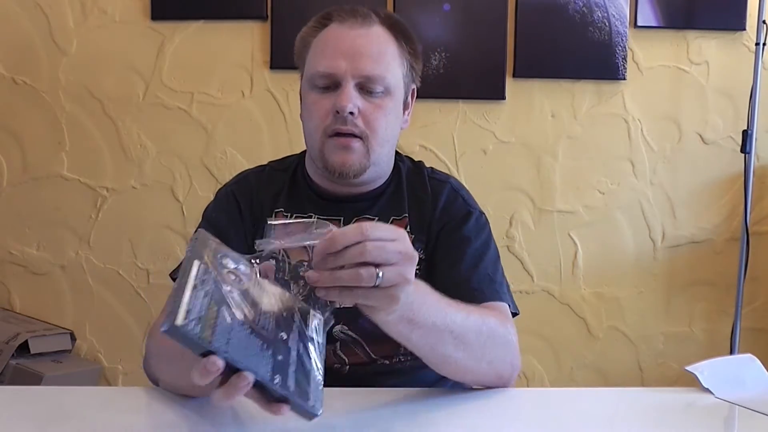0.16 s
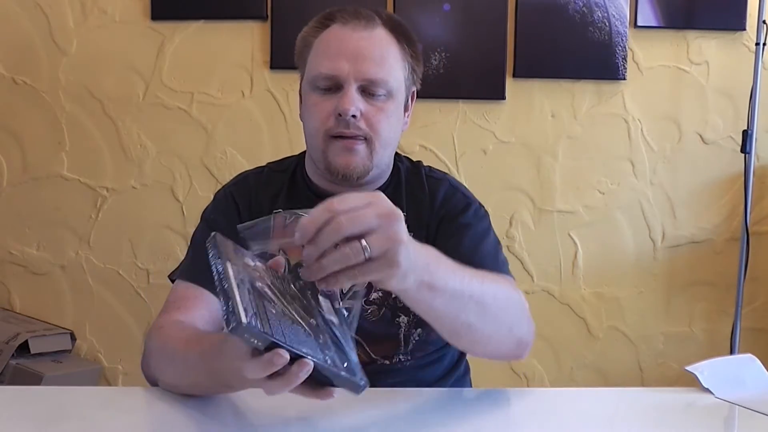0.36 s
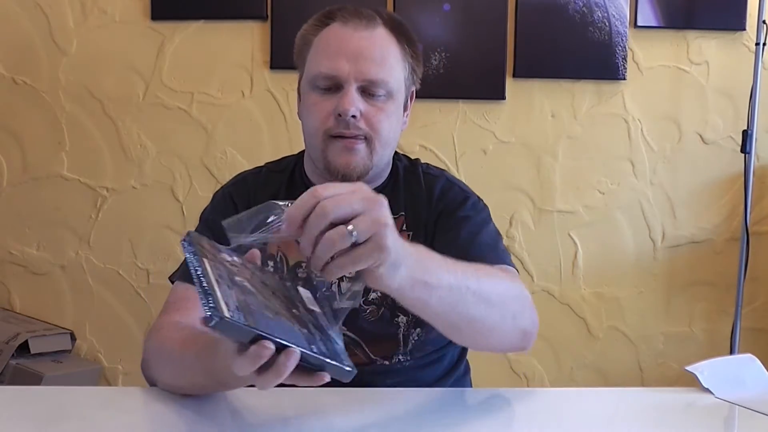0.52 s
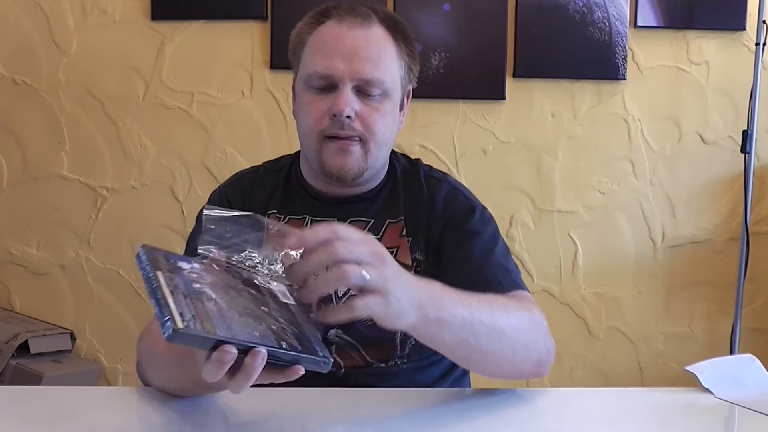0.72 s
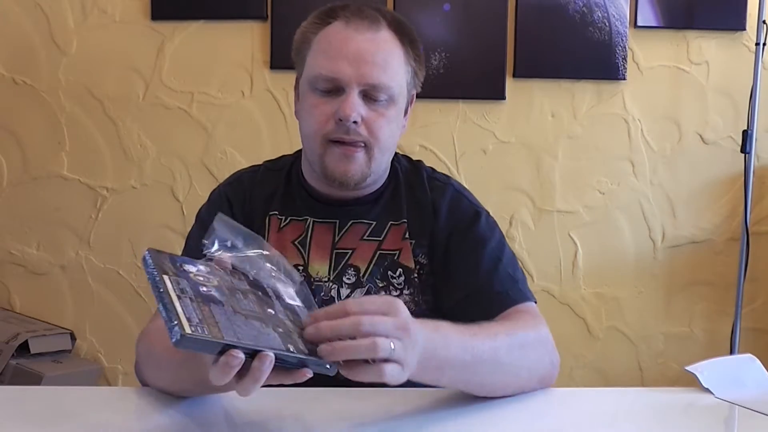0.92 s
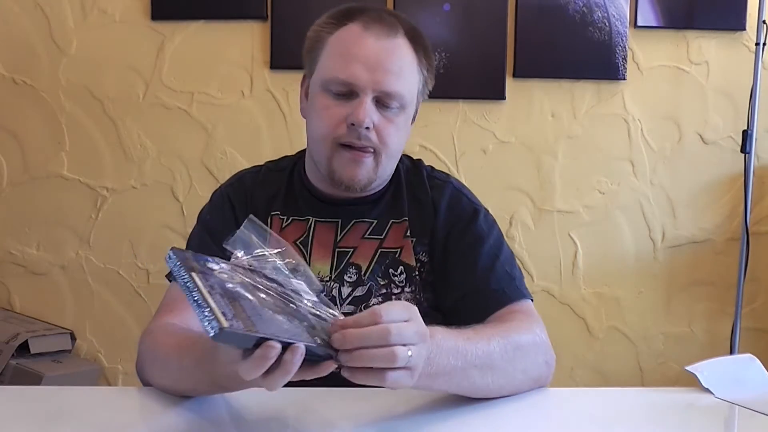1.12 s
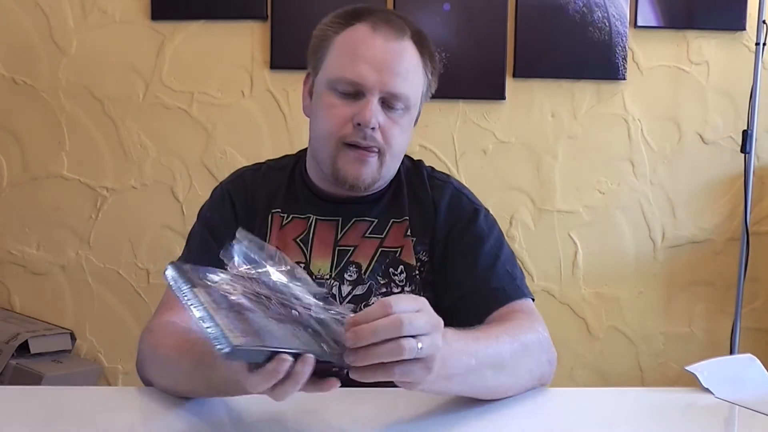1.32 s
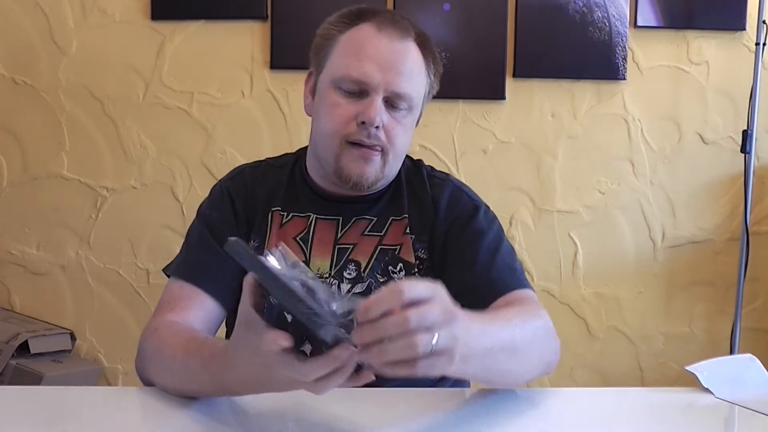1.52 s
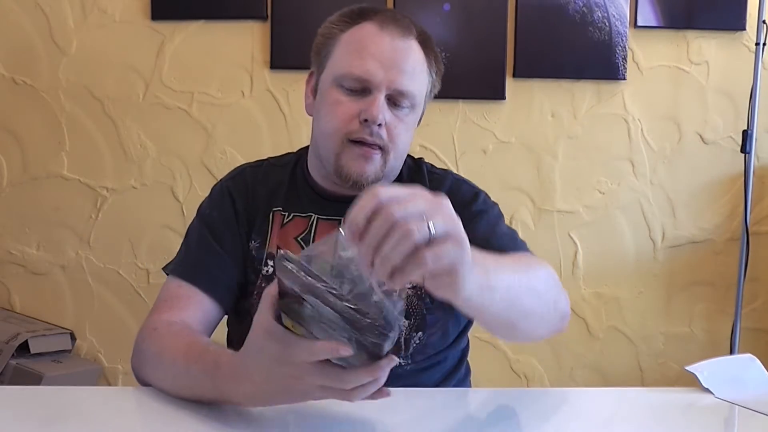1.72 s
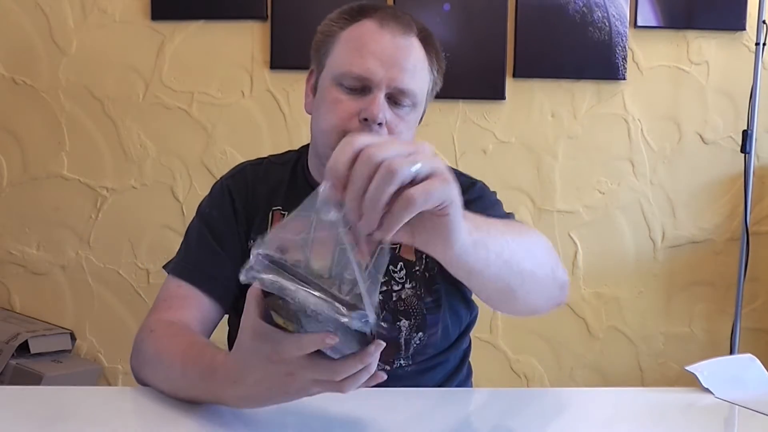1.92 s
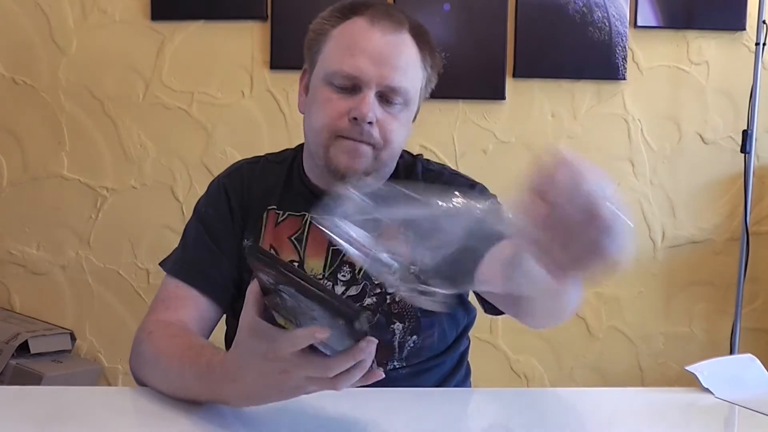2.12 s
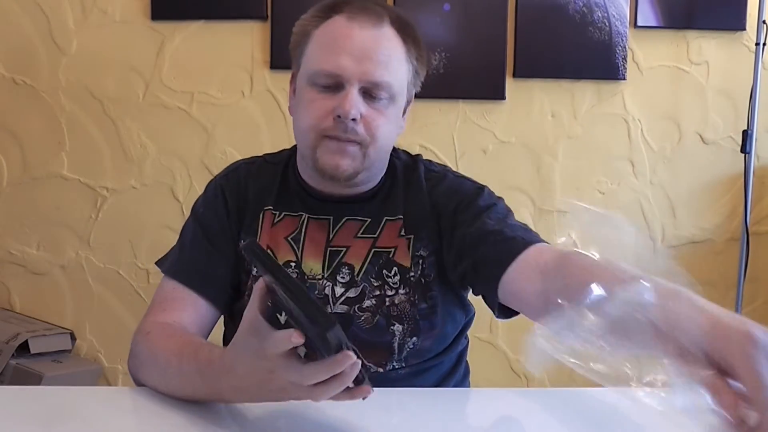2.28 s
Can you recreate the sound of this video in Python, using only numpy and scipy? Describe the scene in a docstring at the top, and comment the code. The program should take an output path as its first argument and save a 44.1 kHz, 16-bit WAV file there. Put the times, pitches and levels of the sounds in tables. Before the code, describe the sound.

Thin plastic wrap crinkles as it is pulled off a hard case, close up in a small, quiet room. After faint rustling, the loudest snap and a short rip come at 0.2 seconds. Uneven crackling and ticks follow, with smaller snaps near 0.7 and 1.0 and a stronger, knocking one at 1.45. The crinkling turns hissier as the film slides free, snapping at 1.7 and 2.0, then fading by 2.3.

```python
"""Thin plastic wrap is pulled off a hard case by hand in a small room.
The taut film releases its tension in sharp snaps that excite the modes of the case, and once rips along it.
Creases buckle in single ticks, and the sliding, crumpling sheet sums many tiny impulses into a fine
crinkle over a duller rustle. A close microphone pair hears this with the room's reverberation and hush."""
import sys
import numpy as np
from scipy import signal
from scipy.fft import rfft, irfft
from scipy.io import wavfile

SR = 44100
rng = np.random.default_rng(int(sys.argv[2]) if len(sys.argv) > 2 else 0)


def transcribe(signal):
    """Save signal, clipped to [-1, 1], as a 16-bit WAV file at the path in sys.argv[1]."""
    frames = np.atleast_2d(signal).T
    limited = np.clip(frames, -1, 1)
    pcm = np.round(limited * 32767).astype(np.int16)
    wavfile.write(sys.argv[1], SR, pcm)


N = 103635
TIME = np.arange(N) / SR
BUCKLE_DECAY_S = 0.0014
# Handling of the sheet. Each row: time in seconds, relative levels of crinkle and of rustle in dB.
HANDLING = [(0,-58.5,-59),(.08,-63,-60.5),(0.182,-67.5,-67.5),(.208,-52.5,-63),(0.22,-33.5,-37),(.242,-36,-42.5),(.262,-38,-44),(0.281,-41,-48),(.305,-51,-51),(.328,-49,-55),
            (.36,-44,-51),(.42,-50,-56.5),(0.464,-43.5,-53),(0.506,-56.5,-68),(.56,-49,-54.5),(.6,-49,-52),(.685,-53,-65.5),(0.71,-43.5,-52.5),(.738,-62,-76),(.756,-50.5,-61.5),(.79,-64,-62),(0.839,-56,-67),(.9,-65,-79),(1.02,-62.5,-71),
            (1.044,-44.5,-49),(1.075,-52.5,-58),(1.14,-51.5,-59.5),(1.24,-51,-62),(1.29,-58.5,-64),(1.36,-60.5,-64),(1.429,-53,-62.5),(1.445,-39,-56.5),(1.5,-53,-49),(1.56,-55,-57.5),(1.656,-51.5,-62),
            (1.708,-40.5,-44),(1.775,-49,-58),(1.83,-50.5,-58.5),(1.854,-43.5,-48.5),(1.88,-51,-54.5),(1.905,-52,-60.5),(1.94,-56,-66),(2.0,-47,-56.5),(2.033,-44.5,-48),(2.11,-52.5,-63.5),(2.17,-60.5,-63),(2.235,-62.5,-71),(2.263,-58,-74),(2.3,-61.5,-92),(2.35,-60,-62)]


def from_db(db):
    """Amplitude grows tenfold with every 20 dB."""
    return 10 ** (np.asarray(db) / 20)


def unit_rms(x):
    """Normalisation to a mean power of one."""
    return x / np.sqrt(np.mean(x ** 2) + 1e-20)


def one_ms(x):
    """Normalisation to the energy of one millisecond at unit level."""
    return x * np.sqrt(SR / 1000 / np.sum(x ** 2))


def at_hz(points, hz):
    """Interpolation of a table on a logarithmic frequency axis."""
    f, value = np.transpose(points)
    return np.interp(np.log(hz + 1), np.log(f), value)


def colour(x, points):
    """Minimum-phase filtering: folding the cepstrum gives a dB spectrum a causal response."""
    size = 4096
    gain = from_db(at_hz(points, np.arange(size // 2 + 1) * SR / size))
    cepstrum = irfft(np.log(gain))
    cepstrum[1:size // 2] *= 2
    cepstrum[size // 2 + 1:] = 0
    return signal.fftconvolve(x, irfft(np.exp(rfft(cepstrum))))[:len(x)]


def high_pass(x, hz, order):
    """Attenuation below a corner frequency."""
    return signal.sosfilt(signal.butter(order, hz, "high", fs=SR, output="sos"), x)


def band_pass(x, low, high, order):
    """Attenuation outside two corner frequencies."""
    return signal.sosfilt(signal.butter(order, [low, high], "band", fs=SR, output="sos"), x)


def add(track, start_s, sound):
    """Superposition of a delayed sound on a track."""
    i = int(start_s * SR)
    track[i:i + len(sound)] += sound[:max(N - i, 0)]


def burst(hz, width, decay_s, rattle):
    """An impulse and a decaying rattle drive one resonance of the given relative bandwidth."""
    t = TIME[:SR // 20]
    push = rattle * rng.standard_normal(len(t)) * np.exp(-t / decay_s)
    push[0] = 1
    edge = np.sqrt(1 + width ** 2 / 4) + width / 2
    return one_ms(band_pass(push + 1e-18, hz / edge, min(hz * edge, SR / 2 - 1000), order=1))


def grains(per_s, spread_db):
    """Shot noise: tiny buckles arrive independently, most small and a few large."""
    sizes = from_db(spread_db * np.minimum(rng.exponential(1, N), 5)) * rng.choice([-1, 1], N)
    return unit_rms(sizes * (rng.random(N) < per_s / SR))


def stick_slip(per_s, spread_db):
    """Stick-slip friction groups the buckles into clumps, expressed as a wandering gain."""
    knots = rng.standard_normal(400)
    return from_db(spread_db * np.interp(TIME * per_s, np.arange(len(knots)), knots))


def crinkle():
    """Buckling rings small facets at their own natural frequencies, while sliding film hisses."""
    # Spectra of the crinkle and the hiss. Each row: frequency in Hz, gain in dB.
    crinkle_spectrum = [(300,-12),(1500,-4),(3000,-8),(4200,0),(5200,-2),(7500,0),(10000,-8.5),(13000,-9.5),(16000,-17)]
    hiss_spectrum = [(5000,-31),(8500,3),(11000,-0.5),(14000,-8.5),(16000,-22.5)]
    # The hiss rises as the sheet slides free. Each row: time in seconds, level against the facets in dB.
    hiss_levels = [(0,-3),(.28,-10),(.4,-8),(.6,-25),(.75,-5),(.95,-7.5),(1.15,-9),(1.4,-12),(1.55,-8),(1.7,-2),(1.9,0),(2.05,0.5),(2.15,-8),(2.35,-5)]
    pitches, facets = np.geomspace(2500, 14000, 8), 0
    for hz in pitches:
        buckles = grains(per_s=3500 / len(pitches), spread_db=1)
        ring = np.sqrt(hz) * burst(hz, width=1, decay_s=BUCKLE_DECAY_S, rattle=0.046)
        facets += signal.fftconvolve(buckles, ring)[:N]
    facets = unit_rms(colour(facets, crinkle_spectrum))
    lone_buckles = from_db(-11.5) * unit_rms(colour(grains(per_s=64, spread_db=2), crinkle_spectrum))
    hiss = unit_rms(colour(grains(per_s=2100, spread_db=2), hiss_spectrum))
    hiss *= from_db(np.interp(TIME, *np.transpose(hiss_levels)))
    times, level_db, _ = np.transpose(HANDLING)
    envelope = from_db(np.interp(TIME, times, level_db) - 4.5)
    return envelope * stick_slip(per_s=41, spread_db=2) * (facets + lone_buckles + hiss)


def rustle():
    """Larger facets resonate lower, so their buckling merges into a dull noise."""
    # Spectrum of the large facets. Each row: frequency in Hz, gain in dB.
    spectrum = [(80,-15),(160,-23.5),(230,-2),(290,-2.5),(520,6),(750,1.5),(1250,-2),(1900,2.5),(2700,-8),(6000,-23)]
    times, _, level_db = np.transpose(HANDLING)
    envelope = from_db(np.interp(TIME, times, level_db) - 2.5)
    return envelope * unit_rms(colour(grains(per_s=3000, spread_db=2), spectrum))


def background():
    """Stationary coloured noise forms the hush of the room."""
    # Spectrum of the hush. Each row: frequency in Hz, gain in dB.
    spectrum = [(25,-14.5),(50,-1.5),(75,-16.5),(100,-2),(140,-7.5),(250,-12),(600,-5.5),(1200,-5.5),(2000,-14),(3000,-17.5),(7000,-49),(15000,-18)]
    return from_db(-68) * unit_rms(colour(rng.standard_normal(N), spectrum))


def ticks():
    """Snap-through buckling: a crease flips over with a click, and the sheet around it flaps lower."""
    # Single creases. Each row: start in seconds, relative level in dB, centre frequency in Hz.
    creases = [(0.0477,-44.5,6570),(0.0697,-46,6600),(.1976,-54,6600),(0.2215,-44,6440),(0.5573,-41.5,6100),(.7065,-37.5,6260),(.7104,-45,7100),
               (0.7291,-32.5,5940),(.822,-50,4000),(0.9936,-50.5,5940),(1.029,-36.5,6940),(1.0772,-45,6000),(1.0807,-40.5,6040),(1.0851,-41,7000),(1.097,-42,7500),(1.1025,-36.5,7450),(1.1054,-32.5,7360),
               (1.159,-41,8200),(1.2886,-54,8600),(1.3163,-41.5,6200),(1.371,-48.5,8700),(1.3798,-43,7600),(1.4518,-35,5840),(1.4819,-35.5,7950),(1.5086,-45,7400),
               (1.5775,-35.5,8040),(1.5923,-41,7000),(1.6039,-49,8200),(1.6294,-35.5,5000),(1.6416,-35,7900),(1.647,-41.5,7600),(1.6525,-45,7500),(1.6708,-42,9700),(1.677,-38,9200),
               (1.71,-37,8000),(1.7434,-36.5,6250),(1.8186,-39.5,7000),(1.827,-37.5,7500),(1.8746,-41,8000),(2.0233,-26.5,8060),(2.053,-39,7600),(2.0775,-39,7200),(2.1442,-49,6100),(2.248,-42,5260),(2.2601,-40,7100),(2.2811,-51.5,7000)]
    # What a crease radiates. Each row: frequency in Hz, gain in dB.
    radiation = [(600,5),(1500,-2),(3000,-2),(4200,-1),(6000,0),(8000,1.5),(10000,-2.5),(12000,-1),(16000,-6)]
    out = np.zeros(N)
    for start, db, hz in creases:
        click = burst(hz, width=0.57, decay_s=BUCKLE_DECAY_S, rattle=0.24)
        flap = burst(hz=1490, width=0.33, decay_s=BUCKLE_DECAY_S, rattle=0.24)
        add(out, start, from_db(db) * (click + from_db(-19) * flap))
    return colour(out, radiation)


def snaps():
    """Impulse excitation: film cracks, the case thumps and rings. Gives direct sound and room feed."""
    # Each row: start in seconds, crack in dB and Hz, thump in dB and Hz, then case ring, low bump
    # and room feed in dB. All levels are relative.
    releases = [(.07,-62,5000,-54,327,-70,-46.5,-13),(0.2076,-14.5,3850,-26.5,480,-35.5,-38.5,-5.5),(0.7012,-36,4970,-36.5,444,-71,-77,-7),(.9941,-57,5000,-58,536,-52,-64,-12),
                (1.031,-36,4300,-39.5,624,-32.5,-52,-13),(1.4487,-22.5,4640,-18.5,610,-40,-38.5,-7.5),(1.7005,-35,3440,-36,1090,-70,-43,-5.5),
                (1.7443,-45,3000,-42.5,1194,-49.5,-47,-2.5),(2.0271,-28,7400,-34,670,-42.5,-41.5,-8),(2.248,-65,5000,-48,1490,-59,-66,2),(2.2586,-45,7000,-51,1480,-65,-64,-23)]
    # Modes of the hand-held case. Each row: frequency in Hz, relative level in dB, T60 in seconds.
    case_modes = [(216,-18,0.14),(375,-9,0.027),(555.5,6.5,0.077),(652,0,0.044),(1016,-8,0.085),(1182,-6,0.11),(1380,-26,.12),(1760,-7,0.073)]
    # Resonances of the taut film. Each row: frequency in Hz, gain in dB.
    taut_film = [(100,-2),(250,-11),(1000,-1),(2200,-3),(2750,2.5),(3350,-8.5),(4000,2),(4800,-4),(8000,-1.5),(15000,-3)]
    direct, feed, t = np.zeros(N), np.zeros(N), TIME[:SR // 2]
    for start, crack_db, crack_hz, thump_db, thump_hz, ring_db, bump_db, room_db in releases:
        ring = 0
        for k, (hz, db, t60) in enumerate(case_modes):
            decay = from_db(db + rng.normal(0, 1) - 60 * t / t60)
            ring += (-1) ** k * decay * np.sin(2 * np.pi * hz * t)
        crack = burst(crack_hz, width=1.23, decay_s=0.0021, rattle=0.27)
        thump = burst(thump_hz, width=0.98, decay_s=0.0052, rattle=0.052)
        bump = burst(hz=216, width=0.94, decay_s=0.0052, rattle=0.052)
        snap = np.zeros(N)
        add(snap, start, from_db(crack_db) * colour(crack, taut_film))
        add(snap, start, from_db(thump_db) * high_pass(thump, 0.34 * thump_hz, order=2))
        add(snap, start, from_db(ring_db) * one_ms(high_pass(ring, hz=290, order=2)))
        add(snap, start, from_db(bump_db) * high_pass(bump, hz=110, order=1))
        direct += snap
        feed += from_db(room_db) * snap
    return direct, feed


def rip():
    """The case acts as a sounding board for a fast run of slips that swells and dies."""
    start_s, peak_s, rise_s, fall_s = 0.21, 0.2333, 0.014, 0.025
    centre_hz, log_width = 1040, 0.58
    edge = np.exp(log_width / 2)
    slips = band_pass(grains(per_s=4000, spread_db=2), centre_hz / edge, centre_hz * edge, order=2)
    swell = np.exp(-np.maximum((peak_s - TIME) / rise_s, (TIME - peak_s) / fall_s))
    return from_db(-34.5) * swell * (TIME > start_s) * unit_rms(slips)


def room(x):
    """Reverberation: strong early reflections lead into a diffuse tail, each band at its own decay rate."""
    # Response of the room. Each row: frequency in Hz, gain in dB.
    response = [(100,-23),(220,8.5),(300,-7),(550,0.5),(1000,-0.5),(1800,5),(2900,-5.5),(4200,-7.5),(7500,-4),(11000,-5.5),(16000,-29.5)]
    # Reverberation times. Each row: frequency in Hz, T60 in seconds.
    decay_times = [(200,.5),(1000,0.33),(4000,0.47),(14000,0.34)]
    gap_s, build_s, early_s, early_db = 0.0047, 0.0078, 0.0083, 14.5
    t = np.maximum(TIME[:SR // 2] - gap_s, 0)
    swell = (1 - np.exp(-t / build_s)) * (1 + from_db(early_db) * np.exp(-t / early_s))
    edges, tail = np.geomspace(80, 18000, 12), 0
    for low, high in zip(edges, edges[1:]):
        noise = band_pass(rng.standard_normal(len(t)), low, high, order=2)
        band = noise * swell * from_db(-60 * t / at_hz(decay_times, np.sqrt(low * high)))
        tail += unit_rms(band) * np.sqrt(2 * (high - low) / SR / len(t))  # energy follows bandwidth
    return colour(signal.fftconvolve(x, tail)[:N], response)


def scatter(x):
    """Scattering off hands, case and table brings treble to the two microphones by unequal paths."""
    # The facets face all ways. Each row: frequency in Hz, side minus mid in dB.
    side_spectrum = [(100,-23),(300,-15.5),(1000,-16.5),(2000,-22),(4500,-13),(8000,-16),(15000,-5)]
    t, peak_delay_s = TIME[:SR // 100], 0.0004
    paths = rng.standard_normal(len(t)) * t * np.exp(-t / peak_delay_s)
    return colour(signal.fftconvolve(x, paths / np.linalg.norm(paths))[:N], side_spectrum)


def scene():
    """Direct and diffuse fields superpose as mid and side; their sum is left, their difference right."""
    # Stereo width of reverberation and hush. Each row: frequency in Hz, side minus mid in dB.
    room_width = [(100,-12),(300,-26),(600,-12),(1500,-6.5),(4000,-1),(8000,-0.5),(15000,10)]
    hush_width = [(60,-5.5),(300,4.5),(1000,0),(4000,6),(15000,-2)]
    tick = ticks()
    snap, snap_feed = snaps()
    bright = tick + crinkle()
    dull = rustle() + rip()
    direct = snap + bright + dull
    feed = snap_feed + from_db(-7) * bright + from_db(-8) * dull
    mid = direct + room(feed) + background()
    side = colour(room(feed), room_width) + colour(background(), hush_width)
    side += from_db(-14) * np.gradient(direct) + scatter(direct)
    return np.array([mid + side, mid - side])


def record(dry):
    """The two microphones have slightly unequal frequency responses, and a steep low-pass cuts the top."""
    # Balance of the pair. Each row: frequency in Hz, left minus right in dB.
    balance = [(100,2.5),(300,2.3),(1000,1),(2000,2.3),(4200,0),(8000,0.5),(13000,0.4)]
    cutoff_hz = 15900
    pair = [colour(x, [(hz, sign * db / 2) for hz, db in balance]) for x, sign in zip(dry, (1, -1))]
    return signal.sosfilt(signal.ellip(10, .1, 70, cutoff_hz, fs=SR, output="sos"), pair)


dry = scene()
out = record(dry)
transcribe(out)
```